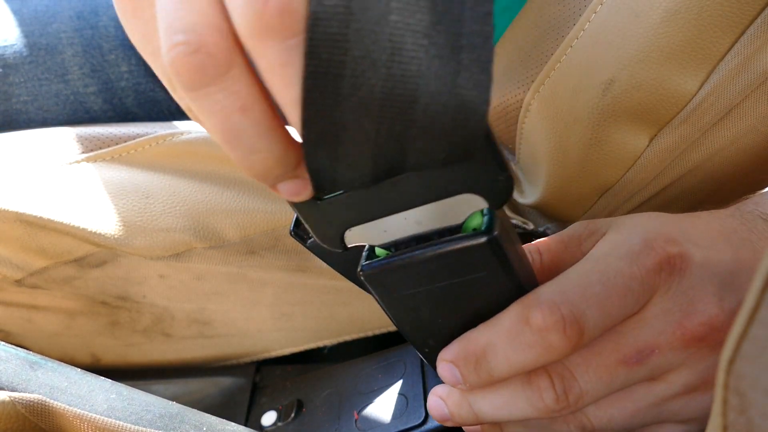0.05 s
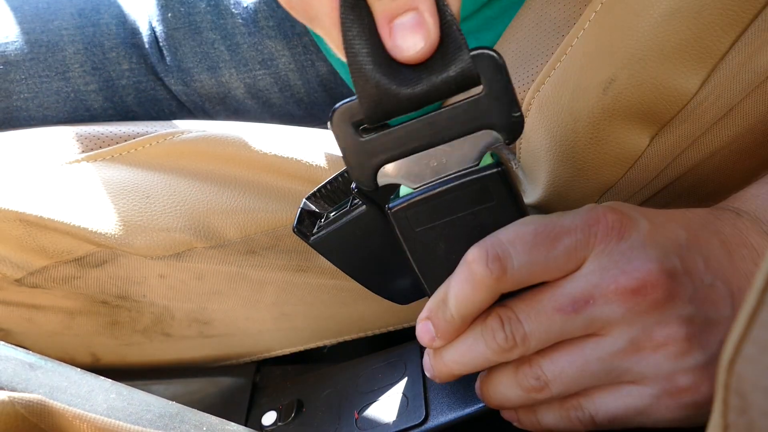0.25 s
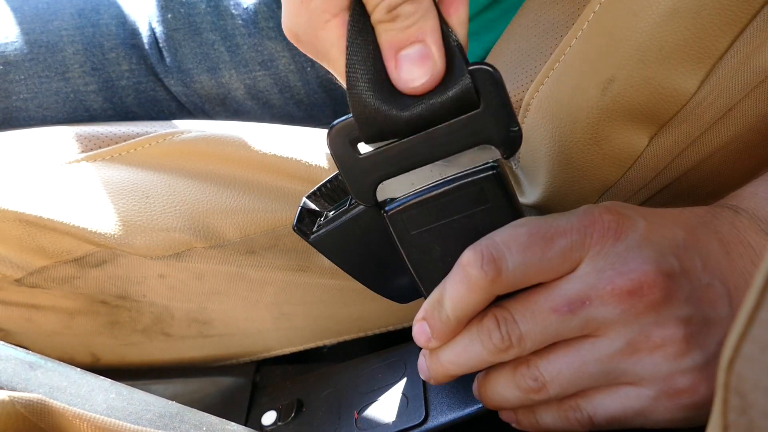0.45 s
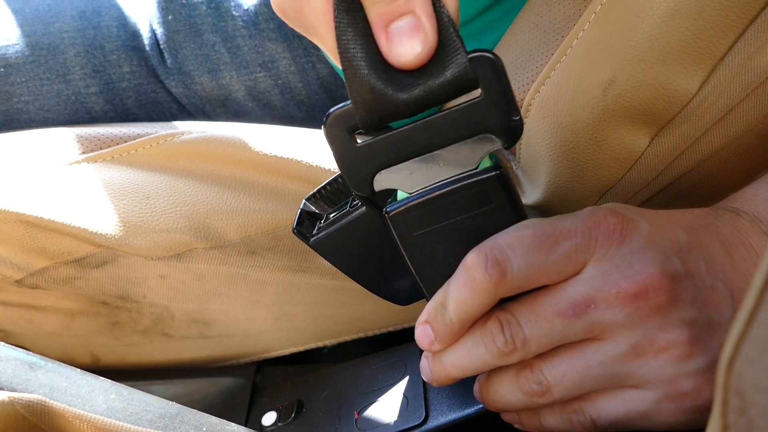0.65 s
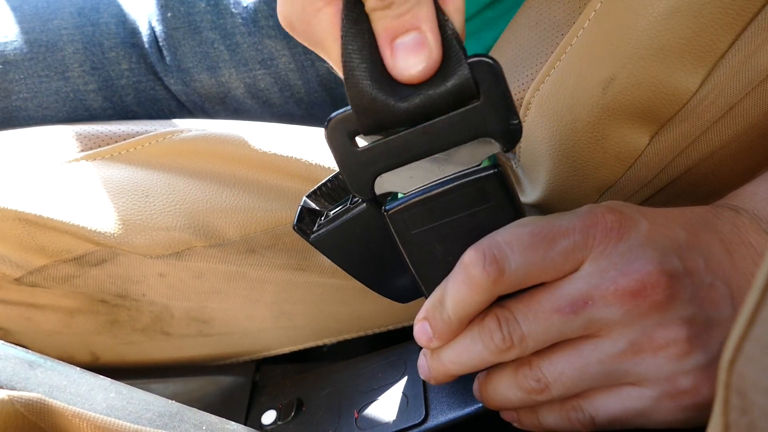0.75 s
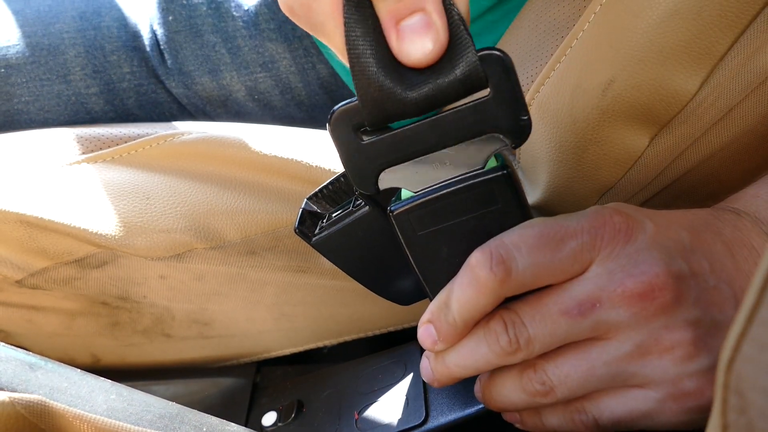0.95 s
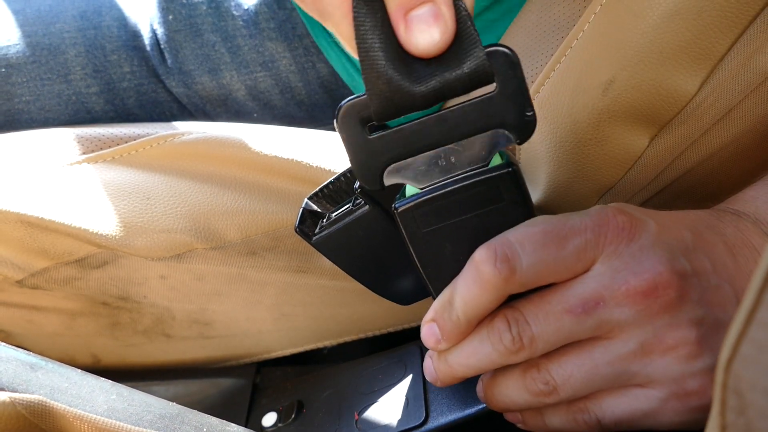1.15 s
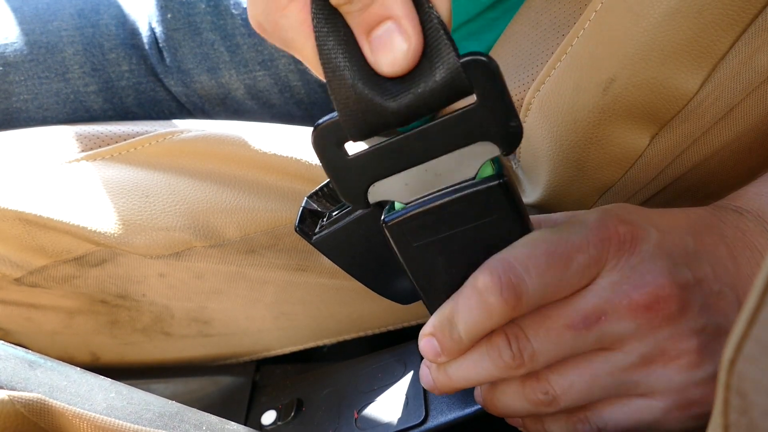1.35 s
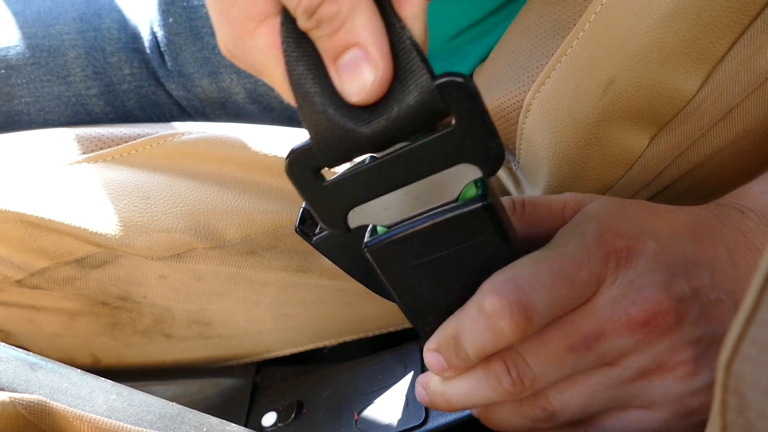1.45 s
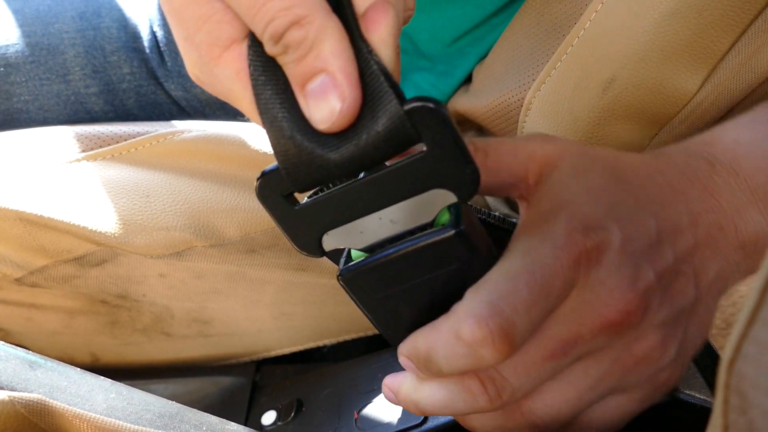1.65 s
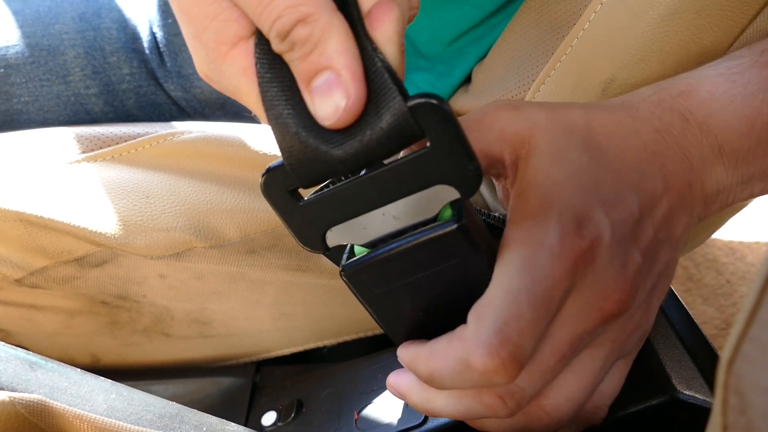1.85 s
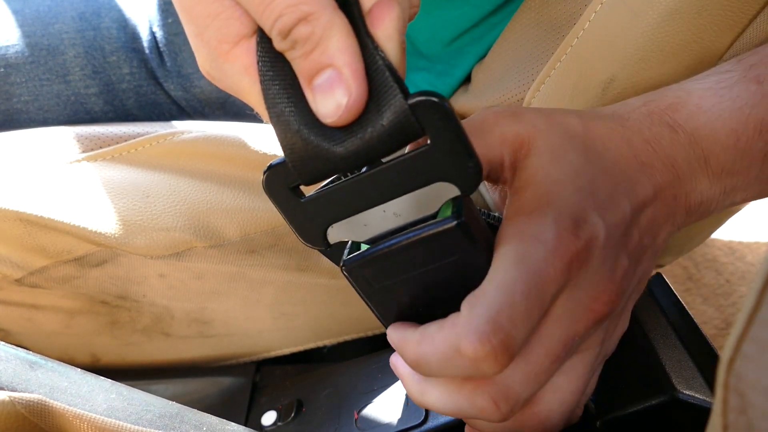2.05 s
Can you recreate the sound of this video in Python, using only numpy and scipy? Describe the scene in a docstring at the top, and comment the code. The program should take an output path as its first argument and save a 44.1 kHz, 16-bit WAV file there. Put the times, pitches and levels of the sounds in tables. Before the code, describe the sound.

A seat belt buckle snaps four times, with small metal taps and scrapes between.

```python
"""A steel seat belt tongue is worked in and out of its buckle by hand, close by in a parked car.
The sprung latch slips and snaps four times; in between, the tongue scrapes and taps in the slot
and the plastic housing knocks. The woven belt rustles, and the small padded cabin answers
the buckle briefly over a low background murmur."""
import sys
import numpy as np
from scipy import signal
from scipy.fft import rfft, irfft, next_fast_len
from scipy.io import wavfile
from scipy.ndimage import uniform_filter1d

SR = 44100
rng = np.random.default_rng(int(sys.argv[2]) if len(sys.argv) > 2 else 0)


def store_pcm(level_fs):
    """Save levels as 16-bit WAV."""
    pcm = np.round(np.clip(level_fs, -1, 1) * 32767).astype(np.int16)
    wavfile.write(sys.argv[1], SR, np.atleast_2d(pcm).T)


N = 92610
LENGTH = SR // 4  # samples in one short sound
EMPHASIS_OCTAVES = 0.068  # width of a boosted steel note

# tone colour of steel hitting steel: f/Hz, level/dB
CRACK = [(200, -44), (1000, -24.5), (2100, -8), (2900, 2), (4200, 0.5), (6000, -0.5), (10500, -6.5),
         (13000, -12.5), (16000, -24)]


def amp(db):
    return 10 ** (np.asarray(db) / 20)


def unit(x):
    return x / np.sqrt(np.mean(x ** 2) + 1e-20)


def along(points, hz, axis=1):
    """A column of a table by frequency, on a log axis."""
    table = np.transpose(points)
    return np.interp(np.log(hz + 1), np.log(table[0] + 1), table[axis])


def curve(rows):
    """One value per sample."""
    return np.interp(np.arange(N) / SR, *np.transpose(rows))


def filtered(x, response):
    """x times a response of frequency."""
    n = x.shape[-1]
    m = next_fast_len(n + 4096)
    return irfft(rfft(x, m) * response(np.fft.rfftfreq(m, 1 / SR)), m)[..., :n]


def tilt(hz, slope):
    """Gain of a brightness slope about the middle of the treble."""
    return amp(slope * np.log2(np.maximum(hz, 1500) / 5500))


def noise(spectrum, size, slope=0):
    """Coloured noise of rms 1."""
    return unit(filtered(rng.standard_normal(size), lambda hz: amp(along(spectrum, hz)) * tilt(hz, slope)))


def ring(modes, scatter_db, detune, slope=0):
    """Damped modes, a little different at each blow; starts at rms 1."""
    t = np.arange(LENGTH) / SR
    hz, db, t60 = np.transpose(modes)[:, :, None]  # t60 is the time to fade by 60 dB
    chance = rng.standard_normal((3, len(modes), 1))
    gain = amp(db + scatter_db * chance[0] + slope * np.log2(hz))
    waves = np.sin(2 * np.pi * hz * (1 + detune * chance[1]) * t) * np.sign(chance[2])
    return np.sum(gain * waves * amp(-60 * t / t60), 0) / np.sqrt(np.sum(gain ** 2) / 2)


def fade(attack_s, t60, hold_s=0):
    """Attack, hold and exponential release."""
    t = np.arange(LENGTH) / SR
    return (1 - np.exp(-t / attack_s)) * amp(-60 * np.maximum(t - hold_s, 0) / t60)


def add(track, s, sound):
    """Mix a sound into the track at s."""
    part = track[max(round(s * SR), 0):][:len(sound)]
    part += sound[:len(part)]


def onset(rise_s):
    """A smooth rise to 1."""
    return 1 - np.exp(-(np.arange(LENGTH) / SR / rise_s) ** 2)


def dying(x, decay):
    """Each frequency of x fades at its own speed."""
    hz, t, z = signal.stft(x, SR, nperseg=256)
    return signal.istft(z * amp(-60 * t / along(decay, hz)[:, None]), SR, nperseg=256)[1][..., :LENGTH]


def strokes(rows):
    """Smooth swells of level, one for each row."""
    t = np.arange(N) / SR
    return sum(amp(db) * np.exp(-((t - s) / half) ** 2) for s, half, db in rows)


def favour(x, notes_hz, db, octaves):
    """Where a blow lands decides which notes come out strongest."""
    bumps = lambda hz: sum(np.exp(-(np.log2((hz + 1) / note) / octaves) ** 2) for note in notes_hz)
    return filtered(x, lambda hz: amp(db * bumps(hz)))


def background():
    """Low murmur of the air around the parked car; its bass is nearly alike on both sides."""
    # tone colour of the murmur: f/Hz, level/dB
    murmur_colour = [(20, -46), (40, -24), (60, -3), (100, -2), (180, 3), (320, 1.5), (750, 1),
                     (1400, -5.5), (3000, -16), (6000, -26.5), (11000, -38), (16000, -40)]
    # its loudness: t/s, level/dB
    murmur_levels = [(0, -52), (.6, -50), (1.2, -50), (1.33, -55), (1.7, -54.5), (2.1, -54)]
    shared = noise(murmur_colour, N)
    apart = np.array([noise(murmur_colour, N), noise(murmur_colour, N)])
    apart = filtered(apart, lambda hz: along([(100, 0.108), (400, 0.56), (1200, 1.0)], hz))
    return amp(curve(murmur_levels)) * unit(shared + apart) * amp([[1.5], [-1.5]])


def webbing():
    """The woven belt slides under the fingers with a fine, uneven hiss."""
    # tone colour of the hiss: f/Hz, level/dB
    hiss_colour = [(300, 6), (1500, 7.5), (4000, 3), (7000, -1), (10500, 0), (15000, -15.5)]
    # its loudness: t/s, level/dB
    hiss_levels = [(0, -69.5), (.18, -63), (.36, -65), (.95, -67.5), (1.24, -64), (1.31, -55.5),
                   (1.45, -55.5), (1.56, -58), (1.7, -59.5), (1.8, -68.5), (2.1, -76.5)]
    flutter_db = 1.6 * unit(uniform_filter1d(rng.standard_normal(N), size=400))
    return noise(hiss_colour, N) * amp(curve(hiss_levels) + flutter_db)


def latch():
    """The catch slips, snaps home, shakes the housing, sets its spring buzzing and thuds into the seat."""
    # snaps: t/s, steel/dB, brightness/(dB per octave), three boosted steel notes/Hz, housing/dB,
    # boosted plastic note/Hz, clack/dB, spring/dB, thud/dB, slip length/s, slip/dB
    snaps = [(0.255, -20, 2, 3140, 5520, 11240, -36.5, 1250, -32, -34, -52.5, 0.009, -34),
             (.5600, -16.5, 3.5, 2780, 5330, 7400, -36.5, 1145, -34, -32.5, -52, 0.0098, -36.5),
             (0.8227, -19, 0.4, 3250, 4560, 5340, -36.5, 238, -31, -30, -55, 0.0115, -40),
             (1.1141, -17, 0.2, 2580, 7300, 8650, -37, 600, -31.5, -38, -51.5, 0.01, -32.5)]
    out = np.zeros(N)
    for (s, steel_db, slope, *notes_hz, housing_db,
         plastic_hz, clack_db, spring_db, thud_db, slip_s, slip_db) in snaps:
        plastic = np.zeros(LENGTH)
        add(plastic, 0.001855, amp(clack_db) * clack())
        add(plastic, 0.005, knock(housing_db, slope=-6.5))  # a snap shakes the lowest note most
        add(out, s - slip_s, amp(slip_db) * slip(slope, slip_s))
        snap = favour(steel(slope, hold_s=0.00068), notes_hz, db=7, octaves=EMPHASIS_OCTAVES)
        add(out, s, amp(steel_db) * snap)
        add(out, s, favour(plastic, [plastic_hz], db=6.5, octaves=0.15))
        add(out, s, spring(spring_db))
        add(out, s, amp(thud_db) * thud())
    return out


def slip(slope, length_s):
    """The catch grinds over its edge, easing off a little until it lets go."""
    progress = np.minimum(np.arange(LENGTH) / SR / length_s, 1)
    grind = noise(CRACK, LENGTH, slope + 0.43)
    return grind * fade(0.0002, t60=0.046, hold_s=length_s) * amp(-1.5 * (progress - 1.0))


def steel(slope, hold_s):
    """Steel on steel: a noisy crack and the short ring of the parts."""
    # notes of tongue and latch: f/Hz, level/dB, t60/s
    steel_notes = [(2696, -2.5, 0.031), (3011, -2.5, 0.0437), (3110, 2.5, 0.052), (3370, 5, 0.05),
                   (3710, -5.5, 0.12), (4413, -4.5, 0.026), (4970, 3, 0.031), (5680, -0.5, 0.042),
                   (5990, -1.5, 0.035), (6220, -1.5, 0.057), (7360, 2.5, 0.046), (7730, -6, 0.0513),
                   (8700, -9, 0.029), (9700, 3, .045), (10670, 0, 0.052), (11550, -3, 0.057)]
    crack = noise(CRACK, LENGTH, slope) * fade(0.00059, t60=0.029, hold_s=hold_s)
    return crack + amp(-8) * ring(steel_notes, scatter_db=1.5, detune=0.004, slope=slope)


def clack():
    """The thin plastic walls rattle."""
    # notes of the walls: f/Hz, level/dB, t60/s
    wall_notes = [(1194, 4, 0.085), (1545, 3, 0.059), (1673, 1, 0.039), (1815, -9.5, 0.056),
                  (2000, -11.5, 0.0483)]
    # tone colour of the rattle: f/Hz, level/dB
    rattle_colour = [(150, -5), (500, -2.5), (1300, 3.5), (2200, 6), (3500, -14.5), (9000, -24)]
    tones = 0.62 * ring(wall_notes, scatter_db=5.5, detune=0.025)
    return tones + amp(1.5) * noise(rattle_colour, LENGTH) * fade(0.00064, t60=0.019)


def knock(db, slope):
    """The hollow note of the whole housing, with no deep bass beneath it."""
    # notes of the hand-held plastic housing: f/Hz, level/dB, t60/s
    housing_notes = [(266.3, -1, 0.13), (404, -1.5, 0.068), (612, 2, 0.063), (867, 0.5, 0.048),
                     (983, -3, 0.0413), (1158, 1, 0.052), (1221, 0, 0.041)]
    detune = 0.0043 if db > -37 else 0.073  # the grip shifts the pitch, less so in firm blows
    tones = amp(db) * ring(housing_notes, scatter_db=1.5, detune=detune, slope=slope)
    bass_cut = signal.butter(2, 170, 'high', fs=SR, output='sos')
    return signal.sosfilt(bass_cut, tones * fade(0.00029, t60=2.0))


def spring(buzz_db):
    """The latch spring buzzes briefly and leaves one faint note."""
    # tone colour of the buzz: f/Hz, level/dB
    buzz_colour = [(150, -3), (260, 7), (500, -5), (1100, 0.5), (1550, 1), (2200, -7.5), (3400, -5.5),
                   (5500, -8.5), (10000, -9.5), (15000, -22.5)]
    # how long it lasts: f/Hz, t60/s
    buzz_decay = [(200, 0.16), (1500, 0.22), (3500, 0.2), (8000, 0.15), (15000, 0.14)]
    note_hz, note_db, note_t60_s = 3790, -53, 0.73
    t = np.arange(2 * LENGTH) / SR
    out = amp(note_db - 60 * t / note_t60_s) * np.sin(2 * np.pi * note_hz * t)
    add(out, 0, amp(buzz_db) * dying(noise(buzz_colour, LENGTH), buzz_decay) * onset(0.007))
    return out


def thud():
    """A soft swell of bass from the seat."""
    # tone colour of the cushion: f/Hz, level/dB
    cushion_colour = [(25, -39), (42, -23), (58, -7.5), (90, -7), (150, 1.5), (300, -49), (1000, -61)]
    peak_s = 0.021
    age = np.arange(LENGTH) / SR / peak_s
    return noise(cushion_colour, LENGTH) * age * np.exp(1 - age)


def taps():
    """The tongue taps the housing: a mix of steel tick, wall clack and hollow knock."""
    # contacts: t/s, steel/dB, brightness/(dB per octave), clack/dB, housing/dB
    contacts = [(0.2732, -40, 5, -39, -72), (0.319, -54, 16, -40, -67), (0.3958, -43, -0.5, -47, -37.5),
                (.402, -60, -13, -44, -38.5), (0.4102, -64, -8, -39, -46), (0.416, -34.5, -0.5, -45, -47),
                (0.4305, -42, -20, -38.5, -43), (0.4431, -29, -4.5, -35, -48), (0.4661, -36.5, 4, -34, -45),
                (0.4707, -35, -1.5, -36, -38), (.5815, -43, -5, -51, -40), (0.6231, -36, -5, -34, -39),
                (0.6762, -34.5, -3.5, -46, -37), (0.7386, -39, -4, -40.5, -40.5), (.748, -66, 3, -38, -48),
                (0.8055, -47, -7, -52, -59), (0.8337, -33, 5, -34.5, -35.5), (0.8412, -22, -2, -34, -35.5),
                (.882, -53, 1, -37.5, -63), (0.951, -47.5, -14, -44.5, -43.5), (1.0218, -41, 0.5, -38, -69),
                (1.0313, -36.5, -2.5, -47, -40), (1.041, -45, 0, -37, -38),
                (1.1606, -35.5, -9, -37.5, -37.5), (1.177, -41, -10.5, -50, -44),
                (1.2043, -43, -8.5, -45.5, -52), (1.23, -55, -9, -46.5, -40), (1.247, -46.5, -4, -61, -66),
                (1.371, -60, 3, -41.5, -39), (1.4194, -42, -15, -35, -40), (1.4263, -60, -6, -49, -36),
                (1.4942, -32, -0.5, -36.5, -22), (1.4988, -37, -5, -36, -44), (1.6415, -54, -11, -40, -38),
                (1.7222, -45, -7, -42, -58), (1.799, -44.5, -9, -52, -70), (2.034, -56, -9, -50, -50),
                (2.095, -49, -12, -49, -45.5)]
    low_hz, high_hz = 2400, 9000
    out = np.zeros(N)
    for s, steel_db, slope, clack_db, housing_db in contacts:
        note_hz = np.exp(rng.uniform(np.log(low_hz), np.log(high_hz)))
        tick = favour(steel(slope, hold_s=0.00053), [note_hz], db=6, octaves=EMPHASIS_OCTAVES)
        plastic = amp(clack_db) * clack() + knock(housing_db, slope=1)  # a tap favours the upper notes
        add(out, s, amp(steel_db) * tick + plastic)
    return out


def scrapes():
    """Steel catches on steel in tiny steps as the tongue slides; some slides end in a thin squeak."""
    # slides along the slot: middle t/s, half length/s, level/dB
    slides = [(.448, 0.016, -49.5), (.468, 0.023, -49), (0.755, 0.037, -50), (0.829, 0.0032, -35),
              (1.042, 0.041, -52), (2.098, 0.017, -56)]
    # squeaks: middle t/s, half length/s, level/dB
    squeaks = [(.499, .008, -52.5), (.768, 0.0078, -45), (1.056, .011, -53.5)]
    # their pitches: f/Hz, level/dB
    squeak_notes = [(5560, 3), (8700, -2.5)]
    catches_per_s, width_hz = 1500, 380
    catches = rng.standard_normal(N) * (rng.random(N) < catches_per_s / SR)
    grit = unit(signal.fftconvolve(catches, steel(slope=-1.7, hold_s=0))[:N])
    tones = lambda hz: sum(amp(db) * np.exp(-((hz - f) / width_hz) ** 2) for f, db in squeak_notes)
    squeal = unit(filtered(rng.standard_normal(N), tones))
    return strokes(slides) * grit + strokes(squeaks) * squeal


def pushes():
    """The hand presses the buckle into the cushion."""
    # presses: t/s, level/dB
    presses = [(.462, -52.5), (0.872, -70.5), (1.22, -57)]
    out = np.zeros(N)
    for s, db in presses:
        add(out, s, amp(db) * thud())
    return out


def cabin(x):
    """Two near echoes and a short padded tail that varies a little every tenth of a second."""
    # echoes off window and roof: delay/s, gain, extra lag between the microphones/s
    surfaces = [(.0046, 0.37, 0.0000049), (0.0141, 0.063, .0001)]
    # how long the cabin rings: f/Hz, t60/s
    cabin_decay = [(100, 0.027), (400, 0.12), (1500, 0.085), (4000, 0.077), (8000, 0.048), (15000, 0.076)]
    side = np.array([[0.5], [-0.5]])  # left, right
    echoes = lambda hz: sum(g * np.exp(-2j * np.pi * hz * (s + side * lag)) for s, g, lag in surfaces)
    treble = lambda hz: 1 - np.exp(-(hz / 1740) ** 2)  # small surfaces return only the treble
    out = filtered(x, lambda hz: 1 + echoes(hz) * treble(hz))
    tail_db, step = -9.5, round(0.1 * SR)
    for start in range(0, N, step):
        tails = dying(rng.standard_normal((2, LENGTH)), cabin_decay) * onset(0.0033)
        for channel, tail in zip(out, tails):
            answer = signal.fftconvolve(x[start:start + step], tail / np.linalg.norm(tail))
            add(channel, start / SR, amp(tail_db) * answer)
    return out


def ports(x):
    """The sound reaches the left microphone later but, in the low mids, louder."""
    # left against right: f/Hz, extra level/dB, lag/radians
    left_right = [(60.3, 2, 0.13), (252, 3, 0.081), (400, 7.5, 0.24), (697, 13, 1.4), (1200, .5, 1.44),
                  (2620, -2, 0.68), (5000, 0, 0.54), (9200, -.5, 0.61), (14050, 0, 1.03)]
    side = np.array([[0.5], [-0.5]])
    gain = lambda hz: amp(side * along(left_right, hz))
    lag = lambda hz: np.exp(-1j * side * along(left_right, hz, axis=2))
    return filtered(x, lambda hz: gain(hz) * lag(hz))


def scene():
    """The buckle in the cabin, the rustling belt and the background, in stereo."""
    buckle = latch() + taps() + scrapes() + pushes()
    return ports(cabin(buckle) + webbing()) + background()


def record(dry):
    """Cut off the treble steeply above 16 kHz."""
    return filtered(dry, lambda hz: 1 / (1 + (hz / 16000) ** 120))


dry = scene()
out = record(dry)
store_pcm(out)
```